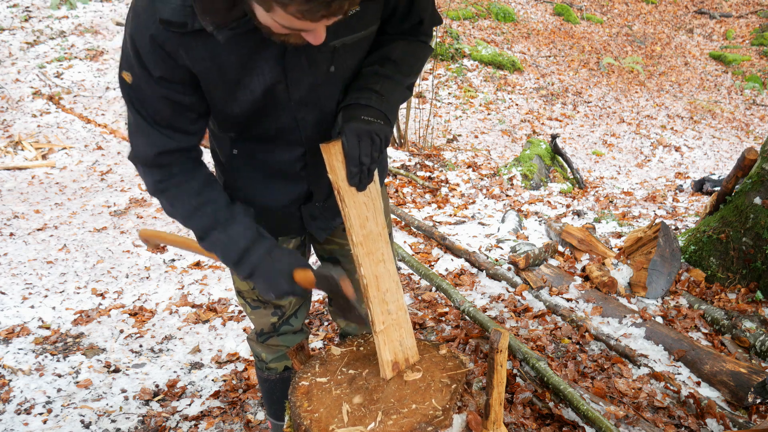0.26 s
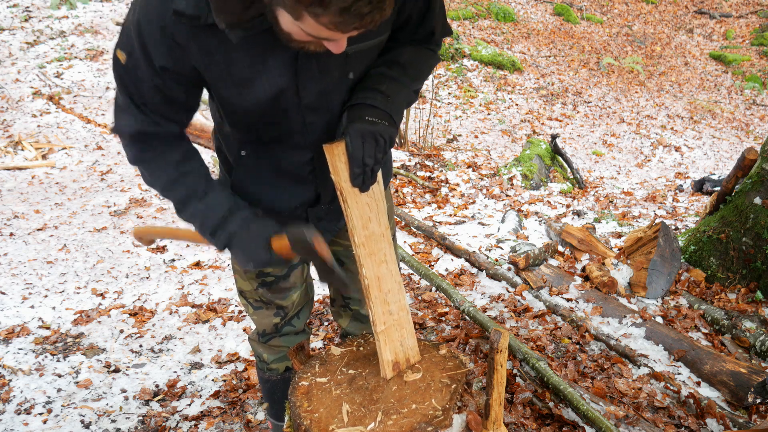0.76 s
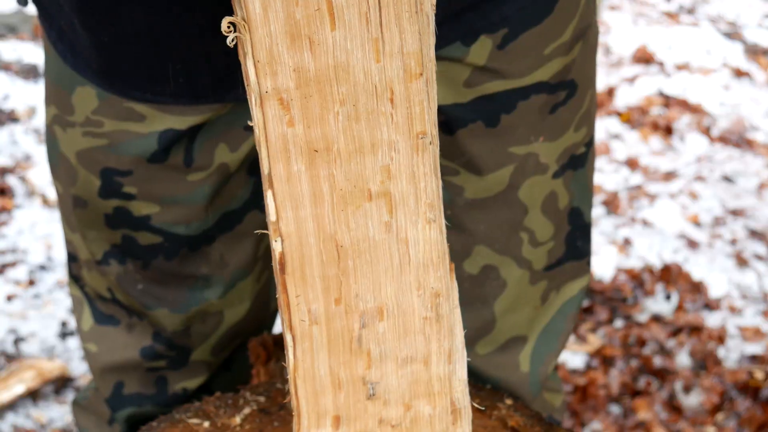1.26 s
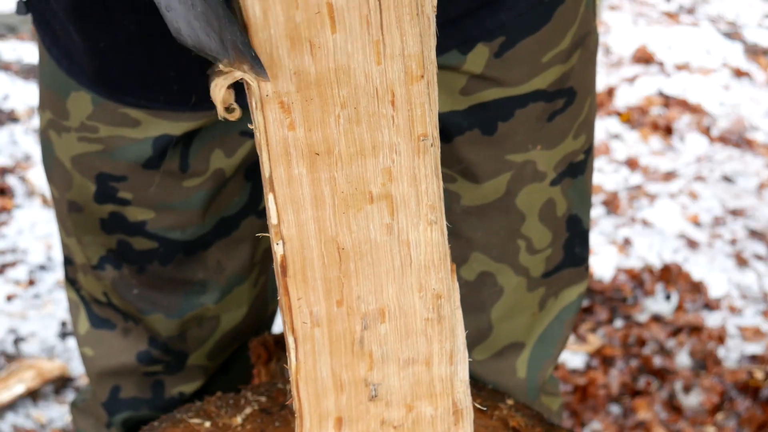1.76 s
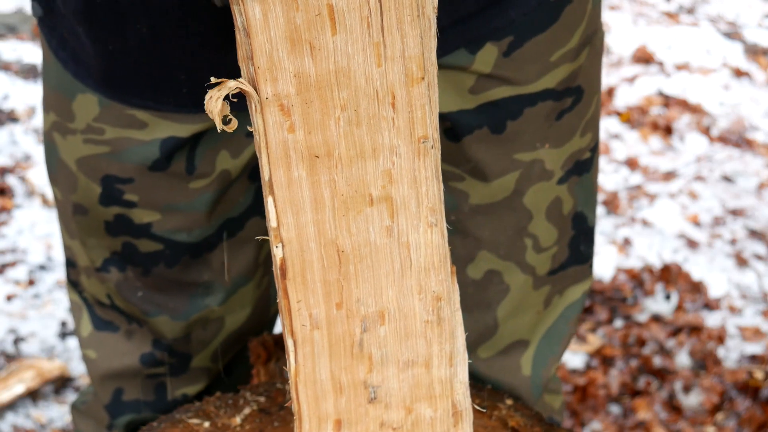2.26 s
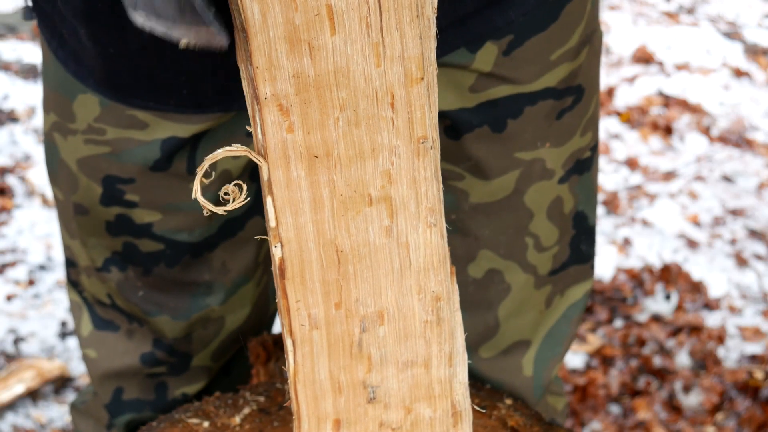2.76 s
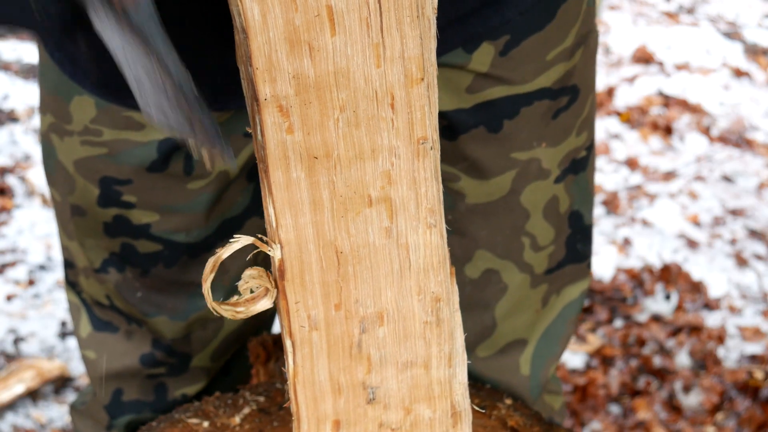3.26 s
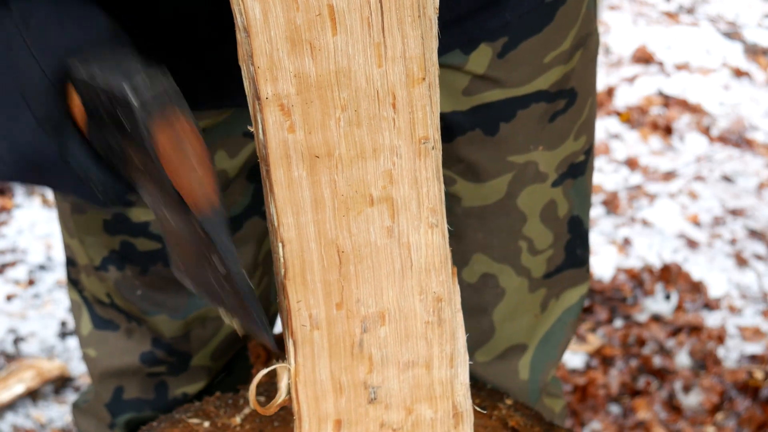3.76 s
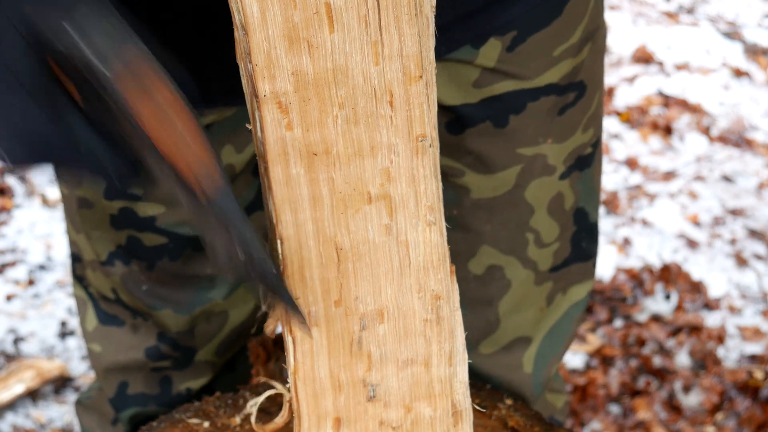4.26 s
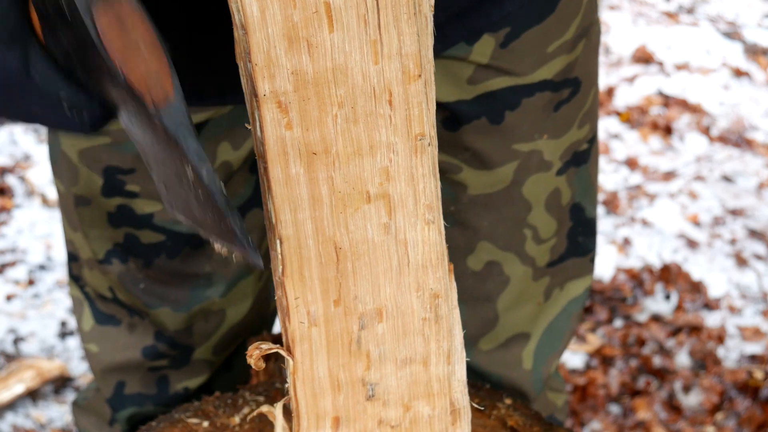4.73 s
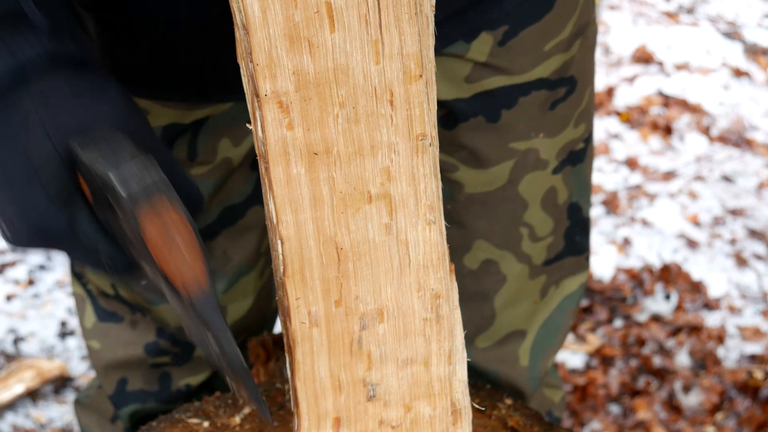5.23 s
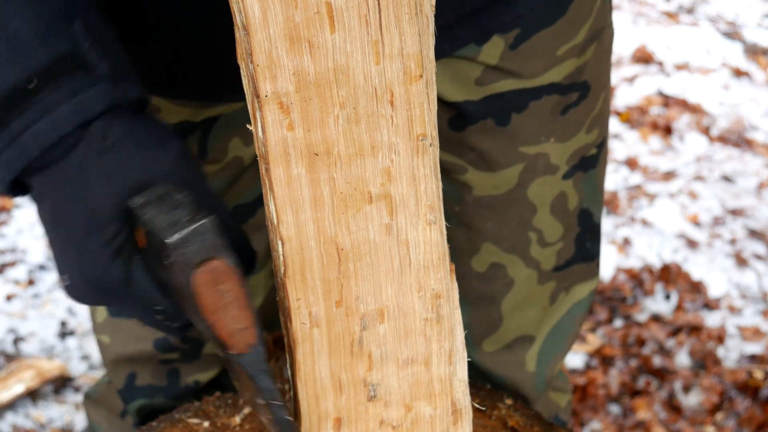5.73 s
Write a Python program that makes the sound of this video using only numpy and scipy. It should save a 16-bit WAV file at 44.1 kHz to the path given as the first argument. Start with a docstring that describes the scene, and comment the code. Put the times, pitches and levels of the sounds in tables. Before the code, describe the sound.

A hatchet shaves a standing billet on a chopping block outdoors. Two dull knocks with longer scrapes come first, then, after a gap, a steady run of brighter hollow knocks, each followed by a very short rasp and crisp tear. Occasional splinters snap. Faint steady rain patters on leaves all around. Close stereo microphone, work near the centre, very little reverberation.

```python
"""Woody knocks, each followed by a short rasp and a tearing shaving, with sharp snaps now and then and light rain.
A hatchet trims a billet on a chopping block in a snowy wood, heard close by in stereo.
Knocks are pushes into a damped resonance; skids, tears and rasps are shaped noise; snaps are short noise bursts.
All of these excite the modes of billet and steel, and a soft low thud follows each tear.
Rain on dead leaves all around is filtered noise for the far drops and resonant clicks for the near ones."""
import sys
import numpy as np
from scipy import signal
from scipy.fft import rfft, irfft
from scipy.io import wavfile

SR = 44100
rng = np.random.default_rng(int(sys.argv[2]) if len(sys.argv) > 2 else 0)


def transcribe(u):
    """Save the signal u as a 16-bit wav file named by the first command-line argument.

    u: samples, shape (n,) or (channels, n), limited to [-1, 1]; the rate is SR.
    q: integer samples, one column per channel.
    """
    v = np.clip(np.atleast_2d(u).T, -1, 1)
    q = np.round(v * 32767).astype(np.int16)
    wavfile.write(sys.argv[1], SR, q)


N = 264159
SIZE = SR // 6   # samples in one short sound
AGE = np.arange(SIZE) / SR   # seconds since its start


def from_db(db):
    """Decibels to an amplitude factor."""
    return 10 ** (np.asarray(db) / 20)


def rms_one(x):
    """Scale a steady sound to rms 1."""
    return x / np.sqrt(np.mean(x ** 2) + 1e-20)


def blow_one(x):
    """Scale a short sound as if all its energy lay in 5 ms at rms 1."""
    return x / np.sqrt(np.sum(x ** 2) / (.005 * SR))


def at_hz(points, hz):
    """Read a spectrum on a log-frequency axis."""
    points_hz, values = np.transpose(points)
    return np.interp(np.log(hz + 1e-9), np.log(points_hz), values)


def cut(x, hz, kind, order=2):
    """Butterworth filter."""
    sos = signal.butter(order, np.minimum(hz, SR * 9 / 20), kind, fs=SR, output="sos")
    return signal.sosfilt(sos, x + 1e-18)


def two_poles(hz, width_hz):
    """Pole radius and denominator of a damped oscillation."""
    r = np.exp(-np.pi * width_hz / SR)
    return r, [1, -2 * r * np.cos(2 * np.pi * hz / SR), r * r]


def resonance(x, hz, width_hz):
    """Two-pole resonance with gain 1 on top."""
    r, poles = two_poles(hz, width_hz)
    return signal.lfilter(np.array([1, 0, -1]) * (1 - r * r) / 2, poles, x + 1e-18)


def disperse(x, hz, width_hz):
    """All-pass: slow bending waves arrive after the first edge of a blow."""
    _, poles = two_poles(hz, width_hz)
    return signal.lfilter(poles[::-1], poles, x)


def colour(x, spectrum):
    """Give steady noise a spectrum; rms 1."""
    n = x.shape[-1]
    gain = from_db(at_hz(spectrum, np.fft.rfftfreq(n, 1 / SR)))
    return rms_one(irfft(rfft(x) * gain, n))


def dying_noise(t60):
    """Dense, quickly damped vibration of unit energy."""
    x = rng.standard_normal(SIZE) * from_db(-60 * AGE / t60)
    return x / np.linalg.norm(x)


def add(track, start_s, sound):
    """Mix a sound into a track."""
    i = max(round(start_s * SR), 0)
    track[i:i + len(sound)] += sound[:max(N - i, 0)]


# hatchet strokes: the blade knocks, skids on, catches with a softer knock and tears up a shaving:
# [start_s, knock_db, thump_hz, contact_hz (brightness before the stiffness factor), skid_s (length),
#  skid_db (as the skid starts, before the edge trim), catch_db, tear_s (length),
#  tear_db (midway, before the edge trim), hiss_db (treble lift of the tear)]
STROKES = [(0.151, -17.5, 540, 850, 0.056, -21, -37, 0.0074, -23, 5.5),
           (0.5243, -13.5, 527, 950, 0.049, -21.5, -35, 0.0046, -28, -4),
           (1.1727, -14, 606, 1350, .012, -18, -34, 0.0106, -23, 1.5),
           (1.453, -12.5, 540, 900, 0.018, -25.5, -20.5, .011, -23.5, 7),
           (1.7464, -9, 780, 1670, 0.02, -26, -27, 0.0033, -27.5, 8),
           (2.0338, -10.5, 704, 1350, .023, -28.5, -19.5, 0.0041, -26, 6),
           (2.297, -10.5, 710, 1360, .018, -27.5, -19, 0.0075, -25, 7),
           (2.5718, -8.5, 800, 1500, .021, -33, -27, 0.015, -25, 3),
           (2.8539, -9.5, 644, 1270, 0.022, -23.5, -20.5, 0.014, -24, 6),
           (3.1236, -10, 736, 1500, 0.013, -35, -28, 0.01, -25, 8),
           (3.3963, -11.5, 704, 1410, 0.027, -28, -25.5, 0.015, -27, -4),
           (3.68, -9, 715, 1300, .011, -30, -30, 0.015, -23, -3),
           (3.9523, -10, 660, 1270, .027, -38, -31, 0.031, -37.5, -6),
           (4.2822, -14.5, 540, 1140, 0.0059, -26, -38, .015, -23.5, 3),
           (4.5744, -9, 594, 1160, 0.015, -36, -23, 0.014, -24, 2),
           (4.7083, -19, 527, 1650, 0.0028, -15.5, -32, 0.0061, -29.5, -4),
           (4.8385, -11, 553, 950, .024, -28, -28, 0.012, -23, 8.5),
           (5.104, -10, 720, 1480, 0.049, -30.5, -23.5, 0.0055, -23, -9),
           (5.3988, -11.5, 620, 990, .006, -30, -31, .017, -27.5, -5),
           (5.6833, -13, 580, 1160, .023, -29, -22.5, .011, -22.5, -11.5),
           (5.9458, -10.5, 654, 1410, .030, -30, -18, .004, -33.5, -26)]


def blade_contacts():
    """Each stroke knocks on landing and again, softly, where the edge catches."""
    for start_s, knock_db, thump_hz, contact_hz, skid_s, _, catch_db, *_ in STROKES:
        yield start_s, knock_db, thump_hz, contact_hz
        yield start_s + skid_s, catch_db, thump_hz, contact_hz


# where the blade lands on the billet: [start_s, place (0 high up .. 1 near the foot)]
BLADE_PLACE = [(0.15, 0.97), (1.45, .05), (2.85, 0.09), (3.4, 0.41), (3.68, 0.99), (5.95, 1)]


def place_at(s):
    """How far down the billet the blade is working."""
    return np.clip(np.interp(s, *np.transpose(BLADE_PLACE)), 0, 1)


# modes of billet and steel head; a lift below 0 dB weakens the mode:
# [mode_hz, width_hz, high_db (lift when struck high up), foot_db (lift when struck near the foot),
#  shaved_db (lift when shaved or snapped, before the ring setting)]
BILLET_MODES = [(285, 157, 4.5, 4.5, 0), (427, 176, 2, 1, -2.5), (527, 98, -1, 6.5, 2.5),
                (641, 32, 7.5, 0.5, 1), (780, 110, -0.5, 2, 0.5), (933, 92, 0.5, 1.5, 5.5),
                (972, 64, 7, -18.5, 3), (1130, 190, 3, -17, -1), (1283, 59, 0, 8, 4.5),
                (1415, 99, -1, 5.5, -1.5), (1657, 93, 9, -4, -6.5), (1746, 110, -25, 6.5, 3.5),
                (2262, 143, 2, 7.5, 4.5), (2739, 74, 21, 12.5, 2.5), (3370, 210, 11, 12, 1.5),
                (4240, 41, 14, 4, 0.5), (5120, 100, 11.5, 13, 2), (6150, 12, 6, 18, 4.5),
                (6770, 16, 11, 10, 3.5), (9280, 320, 12, -5, 2.5), (10150, 69, 3, 5, 4.5),
                (10840, 63, -26, -9, 5.5)]
BURIED_WIDTH_HZ = 94   # buried in the wood, the steel cannot ring more narrowly than this


def billet(x, place=None, ring_db=0, scatter_db=2.5, detune=0.037, wood_hz=2000):
    """Wood and steel lift or weaken their own modes, by how and where they are touched."""
    strongest_db = max(mode[4] for mode in BILLET_MODES)
    for hz, width_hz, high_db, foot_db, shaved_db in BILLET_MODES:
        if place is None:
            # the strongest lift changes by ring_db, the others in proportion
            lift_db = shaved_db * (1 + ring_db / strongest_db)
            width_hz = max(width_hz, BURIED_WIDTH_HZ)
        else:
            lift_db = high_db + (foot_db - high_db) * np.clip(place, 0, 1)
        # the wood's low modes shift with the grip, the high ones stay put
        hz = hz * (1 + detune * rng.uniform(-1.06, 1) * (hz < wood_hz))
        gain = from_db(lift_db + scatter_db * rng.standard_normal())
        x = x + (gain - 1) * resonance(x, hz, width_hz)
    return x


SHIVER_HIGH_DB, SHIVER_FOOT_DB = -4, -10   # after-ring of a knock, high up and near the foot
KNOCK_LEFT_DB = -0.4   # left against right: knocks lean slightly right


def knocks(ring_t60=0.069, thump_width_hz=700, low_hz=125, bite_db=-19, bite_t60=0.021,
           bite_hz=4500, stiffness=0.96, block_hz=165, block_db=-3):
    """One push into a heavily damped thump; block and billet shiver on after it."""
    out = np.zeros((2, N))
    for start_s, level_db, thump_hz, contact_hz in blade_contacts():
        place = place_at(start_s)
        shiver_db = SHIVER_HIGH_DB + (SHIVER_FOOT_DB - SHIVER_HIGH_DB) * place
        shiver = cut(dying_noise(ring_t60), 245, "high") * (1 - np.exp(-AGE / 0.0034))
        push = (AGE == 0) + from_db(shiver_db) * shiver
        thump = resonance(push, thump_hz, thump_width_hz)
        thump = blow_one(cut(thump, stiffness * contact_hz, "low"))
        thump = thump + from_db(block_db) * resonance(thump, block_hz, 80)
        # the edge crushes fibres for a few milliseconds as it bites
        bite = cut(dying_noise(bite_t60), bite_hz, "low", order=1)
        bite = blow_one(cut(bite, 710, "high"))
        bite = cut(bite, 11000, "low")
        # a brighter contact bites harder
        touch = thump + from_db(bite_db) * contact_hz / 1300 * bite
        # light blows hardly move the block, so they lack bass
        bass_hz = low_hz * from_db(0.44 * np.clip(-13.5 - level_db, 0, 8))
        touch = cut(touch, bass_hz, "high")
        knock = billet(touch, place, scatter_db=3.0)
        knock = blow_one(disperse(knock, hz=736, width_hz=1470))
        add(out[0], start_s, from_db(level_db + KNOCK_LEFT_DB / 2) * knock)
        add(out[1], start_s, from_db(level_db - KNOCK_LEFT_DB / 2) * knock)
    return out


# short rasps of the edge: light scrapes, a light tap and the rasp late in one stroke's skid:
# [start_s, length_s, level_db (midway, before the edge trim), hiss_db (treble lift)]
RASPS = [(0.604, 0.0035, -28.5, 3.5), (0.854, 0.0061, -26, -23), (0.949, 0.011, -31.5, -10),
         (1.123, 0.0079, -19, -13), (1.368, 0.013, -22.5, -15), (2.454, 0.0035, -21, -26),
         (3.279, 0.01, -28.5, -18), (3.349, .004, -36, 7), (4.069, 0.016, -31, -20),
         (4.11, .005, -42, 14.5), (4.777, .003, -45.5, 15), (5.07, 0.013, -31, -20), (5.14, 0.01, -26, -3),
         (5.63, .004, -28.5, -7)]
RASP_SWELL_DB, RASP_RING_DB = 1, -10
# the skidding edge loses pressure as it goes
SKID_SWELL_DB, SKID_HISS_DB, SKID_RING_DB = -8.5, -6.5, -5
# a thick, dull shaving shakes the billet more than a thin, hissing one
TEAR_SWELL_DB, TEAR_RING_DB, RING_PER_HISS = 0.5, 5, -0.28


def edge_runs():
    """Skid and tear of each stroke, then the short rasps; levels hold midway through the run."""
    for start_s, _, _, _, skid_s, skid_db, _, tear_s, tear_db, hiss_db in STROKES:
        skid_mid_db = skid_db + SKID_SWELL_DB / 2
        yield start_s, skid_s, skid_mid_db, SKID_SWELL_DB, SKID_HISS_DB, SKID_RING_DB
        tear_ring_db = TEAR_RING_DB + RING_PER_HISS * hiss_db
        yield start_s + skid_s, tear_s, tear_db, TEAR_SWELL_DB, hiss_db, tear_ring_db
    for start_s, length_s, level_db, hiss_db in RASPS:
        yield start_s, length_s, level_db, RASP_SWELL_DB, hiss_db, RASP_RING_DB


# spectrum of tearing fibres, overall level set apart: [freq_hz, density_db (per Hz)]
TEAR_SPECTRUM = [(60, -22.5), (150, -3), (300, 2.5), (800, 1), (1300, -8), (2000, -4), (2800, -2.5),
                 (4200, -6), (7000, -5), (8200, -7), (10000, -8), (13000, -12), (16000, -21)]
EDGE_TRIM_DB = -4.0   # applied to every skid, tear and rasp


def shavings(attack_s=0.00069, tail_t60=0.071, grain_db=2.0, hiss_hz=6500, chip_db=4,
             crack_db=-7, cracks_per_s=450):
    """Fibres break in a dense crackle while the edge travels, and die away as it stalls."""
    out = np.zeros(N)
    for start_s, length_s, level_db, swell_db, hiss_db, ring_db in edge_runs():
        # bundles of fibres give way about a millisecond apart
        bundle_s = AGE[::40]
        clumps = np.interp(AGE, bundle_s, rng.uniform(-1.7, 1.7, len(bundle_s)))
        fine = rms_one(rng.standard_normal(SIZE) * from_db(grain_db * clumps))
        # thicker fibres crack one by one, only while the edge moves
        cracks = (rng.random(SIZE) < cracks_per_s / SR) * rng.uniform(-0.86, 1, SIZE)
        thick = rms_one(cracks) * (AGE < length_s)
        fibres = colour(fine + from_db(crack_db) * thick, TEAR_SPECTRUM)
        fibres = fibres + (from_db(hiss_db) - 1) * cut(fibres, hiss_hz, "high", order=1)
        # every run has a few pitches of its own
        for hz in 1200 * 2 ** rng.uniform(0, 2.32, size=5):
            fibres = fibres + (from_db(chip_db) - 1) * resonance(fibres, hz, 117)
        travel = np.minimum(AGE / length_s, 1)
        stall_db = -60 * np.maximum(AGE - length_s, 0) / tail_t60
        force = (1 - np.exp(-AGE / attack_s)) * from_db(swell_db * (travel - .5) + stall_db)
        add(out, start_s, from_db(level_db + EDGE_TRIM_DB) * billet(fibres * force, ring_db=ring_db))
    return out


# splinters snap, the edge ticks on the wood:
# [start_s, level_db, width_hz (of the bright crack), body_db (woody body against the crack)]
SNAPS = [(0.0285, -33, 4000, 3.5), (0.157, -19.5, 2000, 1.5), (0.171, -31, 4000, -18),
         (0.2126, -27, 4000, -5), (0.551, -15, 3500, 3.5), (0.5652, -27.5, 4000, -16),
         (0.7613, -33, 4000, -3), (0.8534, -24.5, 3500, 2), (0.9573, -21, 4960, -0.5),
         (1.1226, -21.5, 3530, -5), (1.5698, -35.5, 5000, -5), (3.3713, -11.5, 1300, 4),
         (4.2167, -13, 2960, 9.5), (5.0002, -31.5, 4000, 0), (5.4683, -42, 4000, -17)]
SNAP_HZ, SNAP_HZ_PER_DB = 4000, -37   # pitch of a full-scale snap; smaller splinters are higher


def snaps(crack_t60=0.008, tail_db=-17, tail_t60=0.054, top_hz=12000, ring_db=-5,
          body_hz=650, shiver_db=-9):
    """A splinter gives way within a millisecond or two and jolts the wood."""
    out = np.zeros(N)
    for start_s, level_db, width_hz, body_db in SNAPS:
        centre_hz = SNAP_HZ + SNAP_HZ_PER_DB * level_db
        crack = dying_noise(crack_t60) * (1 - np.exp(-AGE / 0.00014))
        crack = blow_one(cut(resonance(crack, centre_hz, width_hz), top_hz, "low"))
        crumbs = blow_one(resonance(dying_noise(tail_t60), 3900, 4500))
        bright = crack + from_db(tail_db) * crumbs
        jolt = (AGE == 0) + from_db(shiver_db) * dying_noise(tail_t60)
        body = cut(resonance(jolt, body_hz, 710), 4000, "low")
        body = blow_one(cut(body, 108, "high"))
        body = disperse(body, hz=900, width_hz=1170)
        snap = blow_one(billet(bright + from_db(body_db) * body, ring_db=ring_db))
        add(out, start_s, from_db(level_db) * snap)
    return out


# SETTLE_FOOT_DB is added in full near the foot, so the thud is softer there
SETTLE_DELAY_S, SETTLE_DB, SETTLE_FOOT_DB, SETTLE_HZ = 0.01297, -32, -17, 277


def settles(swell_s=0.0024):
    """The billet drops back on the block after each tear: a soft, low thud of a few cycles."""
    out = np.zeros(N)
    thud = blow_one(AGE * np.exp(-AGE / swell_s) * np.sin(2 * np.pi * SETTLE_HZ * AGE))
    for start_s, _, _, _, skid_s, _, _, tear_s, *_ in STROKES:
        level_db = SETTLE_DB + SETTLE_FOOT_DB * place_at(start_s)
        add(out, start_s + skid_s + tear_s + SETTLE_DELAY_S, from_db(level_db) * thud)
    return out


def surroundings(x, near_db=-13, near_t60=0.034, sparkle_db=-13, far_db=-33, far_t60=0.1):
    """Ground and body scatter sound to each side, most in the treble; the trunks return a faint wash."""
    scatter = dying_noise(near_t60) * (1 - np.exp(-AGE / 0.0012))
    near = from_db(near_db) * scatter + from_db(sparkle_db) * cut(scatter, 7100, "high", order=1)
    far = cut(np.array([dying_noise(far_t60), dying_noise(far_t60)]), 3000, "low", order=1)
    # opposite signs left and right spread the near scatter
    echo = near * np.array([[1], [-1]]) + from_db(far_db) * far
    return signal.fftconvolve(x.mean(axis=0)[None], echo, axes=1)[:, :N]


def rain_drops(per_s=450, spread_db=4.0, pan_db=8.5, damping=0.72, tilt_db=0.5, top_hz=8000):
    """Near drops tick on leaves, each in one of twelve dull, heavily damped pitches."""
    out = np.zeros((2, N))
    for hz in np.geomspace(700, 8000, num=12):
        chance, size, side, sign = rng.random((4, N))
        at = np.flatnonzero(chance < per_s / 12 / SR)
        # most drops are small, a few are large
        weight = from_db(spread_db * np.minimum(-np.log(size[at]), 4)) * np.sign(sign[at] - .5)
        clicks = np.zeros((2, N))
        clicks[:, at] = weight * from_db(pan_db * (2 * side[at] - 1) * np.array([[1], [-1]]))
        ticks = resonance(clicks, hz, damping * hz)
        out += ticks / np.sqrt(hz) * from_db(tilt_db * np.log2(hz))
    return rms_one(cut(out, top_hz, "low"))


# spectrum of far rain, overall level set apart: [freq_hz, density_db (per Hz)]
WASH_SPECTRUM = [(15, -73), (25, -46), (82, -9), (123, -7), (166, -7.5), (249, -6.5), (354, -2.5),
                 (451, -2), (641, -1), (887, -3.5), (1480, -5.5), (3520, -13), (9070, -18), (14400, -28),
                 (16000, -56)]
# how alike far rain is at left and right: [freq_hz, likeness (1 = identical)]
WASH_LIKENESS = [(60, 0.86), (130, 0.67), (290, 0.77), (640, 0.74), (1410, 0.59), (3100, 0.78),
                 (6820, 0.86), (15000, 0.34)]


def rain_wash():
    """Countless far drops merge into a soft hiss, partly alike at left and right."""
    alike = np.clip(at_hz(WASH_LIKENESS, np.fft.rfftfreq(N, 1 / SR)), -.99, .99)
    mid, side = rfft(rng.standard_normal((2, N)))
    stereo = np.sqrt(1 + alike) * mid + np.sqrt(1 - alike) * side * [[1], [-1]]
    return colour(irfft(stereo, N), WASH_SPECTRUM)


# course of the rain: [start_s, level_db (of the wash)]
RAIN_LEVEL = [(0.0, -41.5), (1.6, -41), (2.17, -43), (5.49, -44), (5.99, -42)]


def rain(drops_db=-6):
    """Far wash and near drops, the drops set against the wash, rise and fall together."""
    level_db = np.interp(np.arange(N) / SR, *np.transpose(RAIN_LEVEL))
    return from_db(level_db) * (rain_wash() + from_db(drops_db) * rain_drops())


def scene(lean_db=0.15):
    """The work is near the centre, with rain on all sides."""
    # all but the knocks and the scattered sound lean slightly left
    lean_left = from_db([[lean_db], [-lean_db]])
    work = knocks() + lean_left * (shavings() + snaps() + settles())
    return work + surroundings(work) + lean_left * rain()


CUTOFF_HZ = 15700


def record(dry):
    """The highest peaks are rounded, the top is cut."""
    rounded = dry / (1 + (dry / .92) ** 6) ** (1 / 6)
    return signal.sosfilt(signal.ellip(10, .2, 80, CUTOFF_HZ, fs=SR, output="sos"), rounded)


dry = scene()
out = record(dry)
transcribe(out)
```